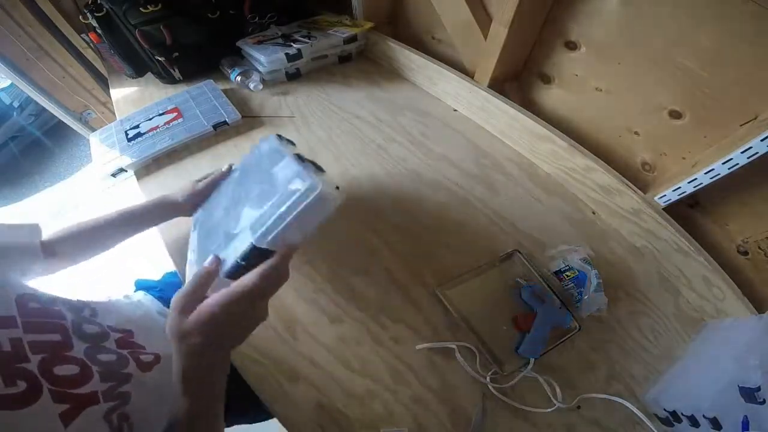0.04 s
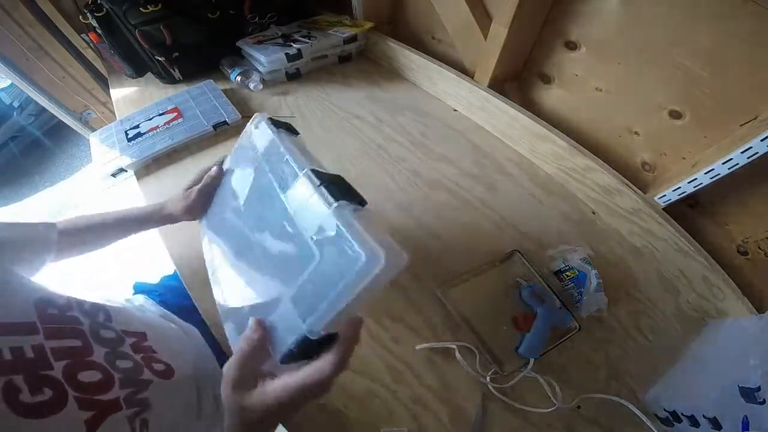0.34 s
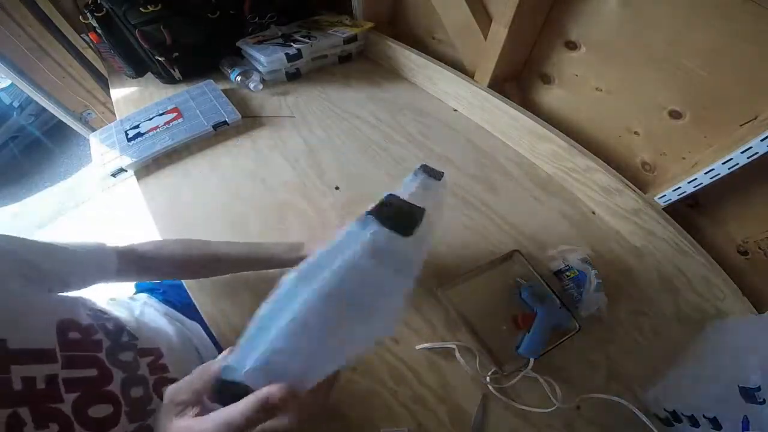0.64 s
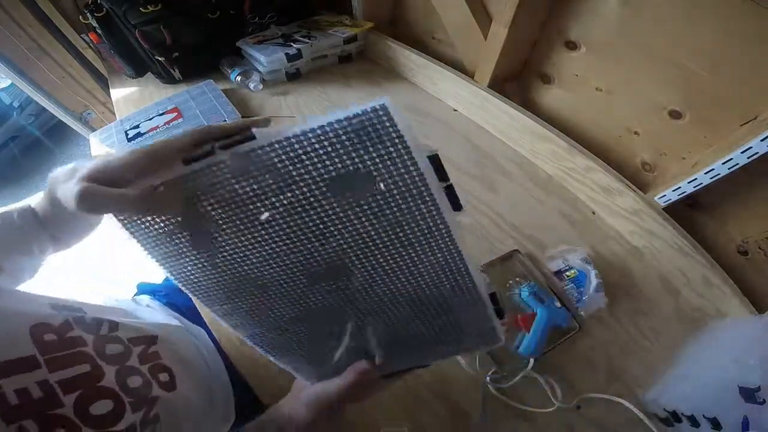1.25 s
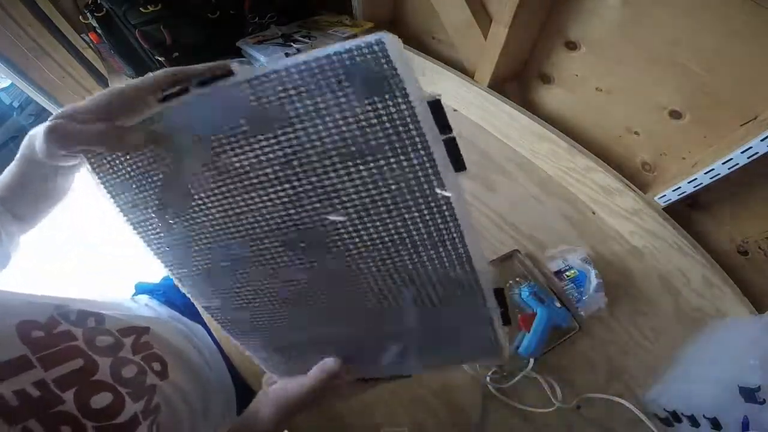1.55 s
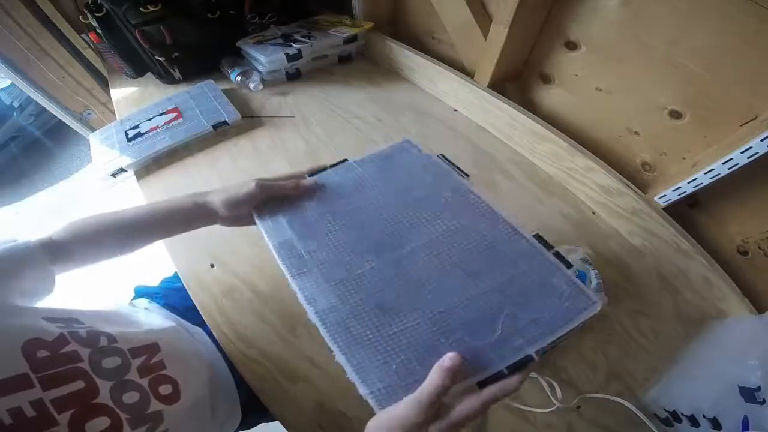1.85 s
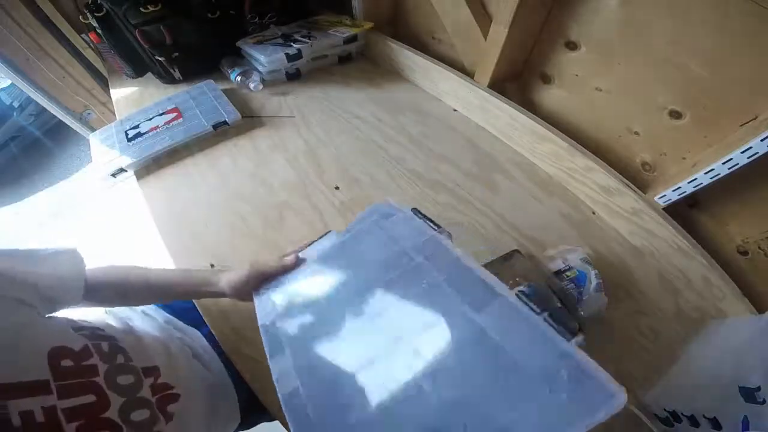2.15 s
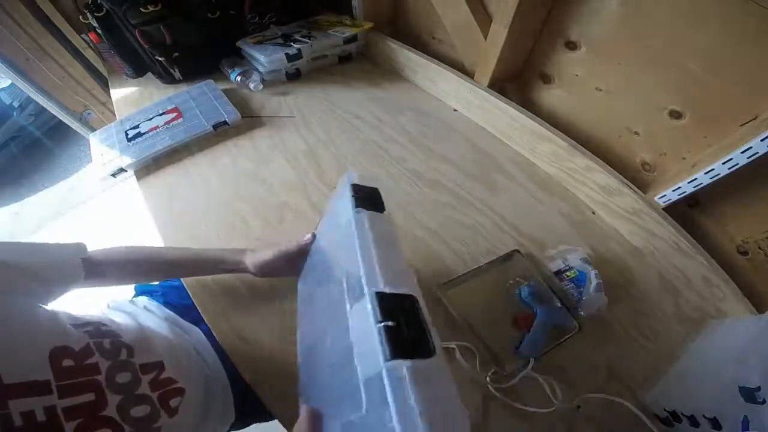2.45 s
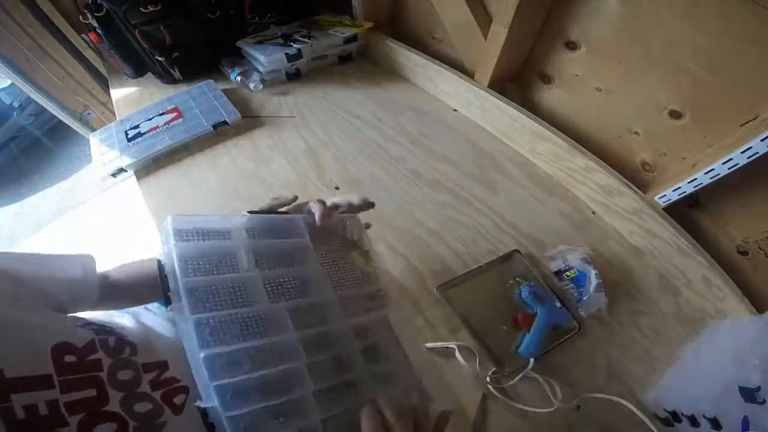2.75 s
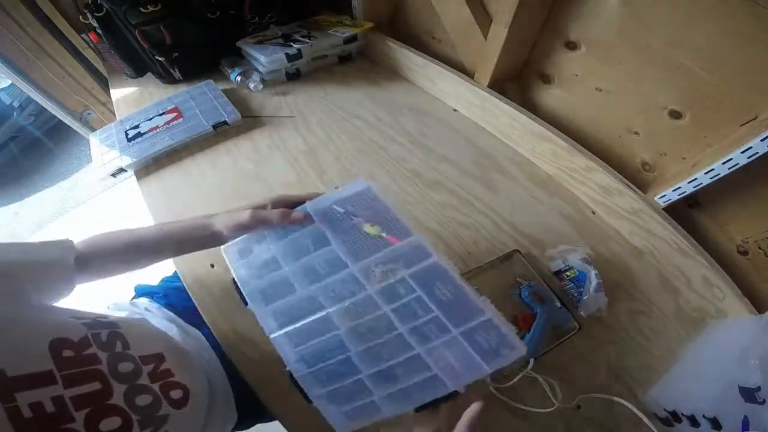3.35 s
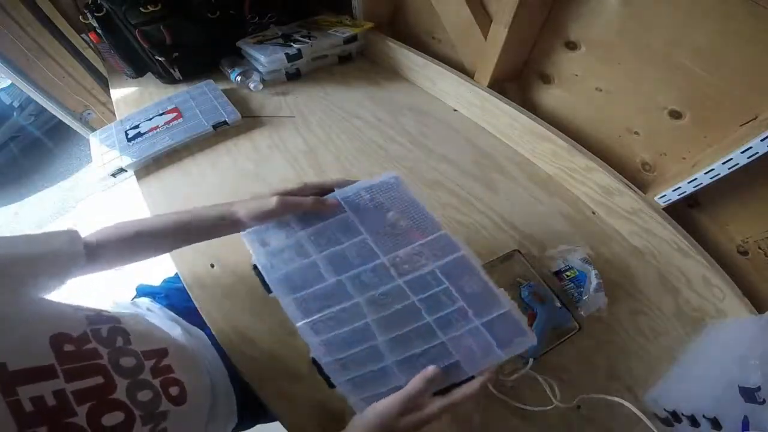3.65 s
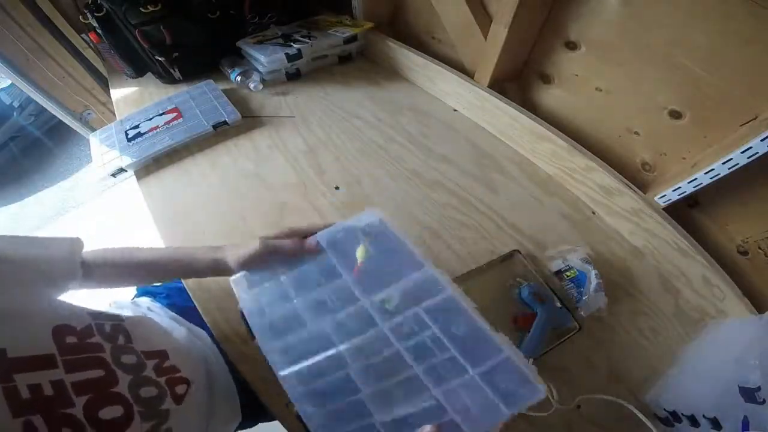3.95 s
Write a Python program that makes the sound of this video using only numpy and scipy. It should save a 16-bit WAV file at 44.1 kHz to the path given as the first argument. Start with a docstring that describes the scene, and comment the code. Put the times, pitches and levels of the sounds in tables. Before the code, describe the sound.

Lures rattle inside a plastic tackle box, close by in a small room. Quick bursts of clatter, hollow knocks and jingling hooks fill the first second, then come slightly further apart until about 2.6 seconds. Softer sliding follows, with a cluster of rattles around 3.2 seconds, a brief lull and a sharp clatter near 3.8. Hands thud on the box now and then, most clearly around 0.4, 1.6 and 3.9 seconds.

```python
"""Lures rattle in quick cascades as a plastic tackle box is shaken and turned over by hand.
At each tilt they slide and land: heavy bodies knock on the walls, hard shells clatter, hooks jingle.
Each impact is an impulse that excites damped resonances. Single pieces tap the dividers or make a
wall ring, and the hands thud on the box as they change grip. The workbench and the walls of a small
wooden room add a short reverberation, over a faint low background."""
import sys
import numpy as np
from scipy import signal
from scipy.io import wavfile

SR = 44100
rng = np.random.default_rng(int(sys.argv[2]) if len(sys.argv) > 2 else 0)


def bounce(signal):
    """Save signal as a 16-bit WAV file at the path given by the first command-line argument."""
    frames = np.transpose(np.atleast_2d(signal))
    limited = np.clip(frames, -1, 1)
    pcm = np.round(limited * 32767).astype(np.int16)
    wavfile.write(sys.argv[1], SR, pcm)


N = 176400

# Cascades of landing lures; levels in all tables are relative
# (peak time [s], build-up [s], decay [s], wall level [dB], shell level [dB], hook level [dB])
CASCADES = [ (0.093, 0.011, 0.02, -23, -22, -29), (0.13, 0.022, 0.02, -16.5, -27, -29.5),
            (0.239, 0.011, 0.018, -11.5, -14.5, -21.5), (0.334, 0.0095, 0.012, -17, -15.5, -26),
            (0.432, 0.0094, 0.019, -15.5, -28, -27.5), (0.5, 0.015, 0.017, -13, -17, -22),
            (.59, 0.0071, 0.026, -27.5, -22.5, -32.5), (0.66, 0.011, 0.027, -15.5, -18, -27),
            (0.716, 0.011, 0.015, -26, -29, -30.5), (0.75, 0.017, 0.0086, -25, -18, -24),
            (0.814, 0.011, 0.021, -15, -16, -24.5), (0.904, 0.0084, 0.012, -23.5, -15.5, -26),
            (0.959, 0.012, 0.025, -16.5, -15.5, -26), (1.098, 0.0091, 0.011, -36, -26, -34),
            (1.164, 0.04, 0.022, -18, -20, -30.5), (1.246, 0.035, 0.014, -17.5, -28, -31.5),
            (1.404, 0.017, 0.016, -14.5, -36, -23), (1.555, 0.024, 0.01, -12.5, -19, -21.5),
            (1.623, 0.0062, 0.023, -28, -28, -36), (1.748, .013, 0.025, -13, -30, -24.5),
            (1.937, 0.031, 0.031, -16.5, -31, -27.5), (2.075, 0.041, 0.056, -26.5, -31, -39.5),
            (2.122, 0.0061, 0.0073, -22, -28, -40), (2.311, 0.037, 0.041, -21, -30, -39),
            (2.347, 0.014, 0.029, -25, -19, -27.5), (2.466, 0.017, 0.04, -25, -26.5, -36.5),
            (2.548, 0.019, 0.037, -16, -17.5, -25), (2.75, 0.038, 0.089, -31.5, -30.5, -39.5),
            (3.022, 0.023, 0.11, -29.5, -26, -38.5), (3.132, 0.0059, 0.048, -23, -20.5, -36),
            (3.178, 0.021, 0.03, -24.5, -19, -35), (3.254, 0.0063, 0.033, -25, -21, -30.5),
            (3.439, 0.018, 0.019, -42, -35.5, -48), (3.614, 0.0083, 0.01, -25.5, -31, -35),
            (3.69, 0.022, 0.072, -33.5, -34.5, -45), (3.797, .014, 0.016, -14, -16.5, -24),
            (3.882, 0.015, 0.035, -37, -25, -36), (3.965, 0.012, 0.038, -24.5, -21.5, -32)]
# Loose pieces sliding between cascades (time [s], level [dB])
SLIDING = [(0, -38), (.19, -34.5), (.3, -27.5), (.56, -35.5), (.7, -33), (1.05, -40.5), (1.3, -28),
           (1.86, -32), (2.1, -40), (2.2, -50.5), (2.26, -31.5), (2.42, -51), (2.6, -38.5), (2.68, -45),
           (2.82, -68), (2.93, -45), (3.1, -30.5), (3.37, -50.5), (3.57, -51.5), (3.7, -37.5), (4, -35.5)]
# Single pieces striking a divider (time [s], level [dB], spectral tilt [dB/decade])
DIVIDER_TAPS = [(.212, -14, -3), (.224, -12, 12.5), (.3147, -14.5, 3), (0.4183, -13, 9), (0.492, -2.5, 13),
                (0.799, -11.5, -4), (0.8918, -10.5, 1), (.942, -7, 3), (1.0941, -7, 18), (1.1408, -12, -1),
                (1.551, -3.5, -1), (1.75, -12, -8), (1.934, -14, 4), (2.2224, -21, -9), (2.819, -16.5, 15),
                (3.204, -10.5, 1), (3.2468, -8.5, 5), (3.5975, -23, 21), (3.7557, -8.5, -7), (3.783, -5, 4),
                (3.960, -15, 12)]
# Heavy lures hitting a wall squarely (time [s], level [dB], wall frequency [Hz])
WALL_KNOCKS = [(.089, -16, 870), (.231, -15, 787), (.251, -7.5, 858), (.4718, -10.5, 773), (.609, -15, 696),
               (.6422, -8, 820), (.713, -12.5, 810), (.809, -12.5, 779), (.956, -8.5, 787),
               (1.181, -11.5, 760), (1.5233, -15, 806), (1.7217, -11.5, 605), (1.7346, -5, 828),
               (1.9298, -10, 874), (2.0175, -16.5, 780), (2.528, -14.5, 534), (2.546, -6.5, 758),
               (2.566, -15, 920), (3.126, -14.5, 820)]
# Hands bumping the box (time [s], level [dB], frequency [Hz])
HAND_BUMPS = [(0.142, -26, 164), (0.401, -17.5, 260), (0.422, -7.5, 365), (1.483, -20, 294),
              (1.634, -12, 265), (1.655, -9.5, 303), (2.46, -17.5, 230), (2.741, -17.5, 307),
              (3.012, -18.5, 290), (3.257, -21.5, 253), (3.314, -27.5, 298), (3.43, -26, 297),
              (3.699, -21.5, 300), (3.836, -17, 238), (3.859, -11, 370), (3.88, -14.5, 255)]
# Spectrum of each kind of contact (frequency [Hz], level [dB])
WALL_SPECTRUM = [(40, -55), (130, -19), (260, -6), (430, 0), (650, -0.5), (830, -2), (1080, -4.5),
                 (1600, -8.5), (3000, -16), (15000, -73)]
SHELL_SPECTRUM = [(40, -47), (300, -9.5), (800, -4.5), (1300, -1), (2100, 0.5), (3400, -3.5), (4600, -8.5),
                  (5600, -17), (9000, -17), (15000, -38.5)]
HOOK_SPECTRUM = [(40, -51), (1000, -31.5), (3000, 2), (4700, 1), (5500, -2.5), (7000, -1.5), (7700, -6.5),
                 (9600, -5), (11500, -11.5), (13500, -16.5), (15300, -29)]
TAP_SPECTRUM = [(40, -33), (140, -18), (300, -9), (850, 4), (1100, 0.5), (1600, -3), (3200, -12),
                (15000, -64.5)]
# Resonances of the box and its contents (frequency [Hz], bandwidth [Hz], level [dB])
BOX_MODES = [(296, 61, -22.5), (822, 115, -8), (885, 60, -11), (1760, 340, -12), (2048, 78, -8.5),
             (3280, 130, -13)]
# Bass of the rattle, which thins while the box stands on edge (time [s], gain [dB])
BASS_GAIN = [(.5, -0.5), (.57, -3.5), (.97, -2), (1.2, 1)]
# Decay of the room (frequency [Hz], reverberation time [s])
REVERB_TIMES = [(150, 0.25), (3000, 0.13), (14000, 0.23)]
# Spectrum of the steady background (frequency [Hz], level [dB])
BACKGROUND_SPECTRUM = [(20, -15), (38, -10), (57, -2.5), (70, -7), (95, 0.5), (140, -13.5), (540, -13),
                       (1000, -25), (4000, -38), (15000, -62)]


def lures():
    """Superposition of impacts: heavy bodies knock first, shells clatter, light hooks settle last."""
    heavy = agitation(slide_db=0.5, lag_s=0, linger=1.0, kind=0)
    hard = agitation(slide_db=0.5, lag_s=0.0012, linger=1.08, kind=1)
    light = agitation(slide_db=-9.5, lag_s=0.0029, linger=1.17, kind=2)
    walls = impacts(heavy, WALL_SPECTRUM, per_s=320, spread_db=6, fade_s=.002, ring_db=-2, hollow=.1)
    shells = impacts(hard, SHELL_SPECTRUM, per_s=420, spread_db=8, fade_s=.003, ring_db=5)
    hooks = impacts(light, HOOK_SPECTRUM, per_s=650, spread_db=10, fade_s=.005, ring_db=5)
    return amp(-5) * walls + amp(-3.5) * shells + amp(0.44) * hooks


def agitation(slide_db, lag_s, linger, kind, build_curve=1.65):
    """Incoherent sources add in power: sliding and cascades form one amplitude envelope."""
    t = np.arange(0, N / SR, .001)
    power = amp(np.interp(t, *np.transpose(SLIDING)) + slide_db) ** 2
    for peak, rise, fall, *levels in CASCADES:
        age = t - peak - lag_s
        falloff = np.where(age < 0, abs(age / rise) ** build_curve, 2 * age / (fall * linger))
        power += amp(levels[kind]) ** 2 * np.exp(-falloff)
    return np.interp(np.arange(N) / SR, t, np.sqrt(power))


def impacts(envelope, spectrum, per_s, spread_db, fade_s, ring_db, hollow=0, count=90):
    """Shot noise: many pieces strike at irregular times, with strengths that follow an envelope."""
    pieces = [contact(fade_s, ring_db) + hollow * wall_mode() for _ in range(count)]
    response = colour(signal.unit_impulse(2048), spectrum)
    coloured = signal.fftconvolve(pieces, response[None], axes=1)
    mean_energy = np.mean(np.sum(coloured ** 2, axis=1))
    jitter, force, choice = rng.random((12000, 3)).T
    times = (np.arange(len(jitter)) + 2 * jitter) / per_s
    strengths = unit(amp(spread_db * (2 * force - 1))) * np.sqrt(SR / per_s)
    hits = np.zeros(N)
    for s, gain, which in zip(times[times < N / SR], strengths, choice):
        add(hits, s, gain * envelope[int(s * SR)] * pieces[int(which * count)])
    return signal.oaconvolve(hits, response / np.sqrt(mean_energy))[:N]


def contact(fade_s, ring_db, size=1300):
    """Impulse response of a piece in its compartment: a click, then dense modes dying away."""
    t = np.arange(size) / SR
    sound = rng.standard_normal(size) * np.exp(-t / fade_s)
    sound *= amp(ring_db) / np.linalg.norm(sound)
    sound[0] += 1  # the click
    return sound / np.linalg.norm(sound)


def wall_mode(centre_hz=825.5, log_spread=0.17, ring_s=0.013):
    """Free vibration: each compartment wall rings at its own natural frequency."""
    t = np.arange(1300) / SR
    hz = centre_hz * np.exp(log_spread * rng.uniform(-1.06, 1))
    note = np.cos(2 * np.pi * hz * t) * np.exp(-t / ring_s)
    return note / np.linalg.norm(note)


def divider_taps(gain_db=-1):
    """A brief impact has a broad spectrum: single lures tap a divider, each with its own brightness."""
    out = np.zeros(N)
    for s, db, tilt_db in DIVIDER_TAPS:
        tap = colour(contact(fade_s=.0035, ring_db=-1.5), TAP_SPECTRUM, tilt_db, size=1024)
        add(out, s, amp(db + gain_db) * tap / abs(tap).max())
    return out


def wall_knocks(gain_db=-1.5, ring_s=0.009, click_db=-4.5, size=3000):
    """Impulse excitation: a square hit gives a dull click and leaves the wall in damped oscillation."""
    out, t = np.zeros(N), np.arange(size) / SR
    for s, db, hz in WALL_KNOCKS:
        click = colour(contact(fade_s=.0035, ring_db=1.5, size=size), WALL_SPECTRUM)
        note = np.sin(2 * np.pi * hz * t) * np.exp(-t / ring_s)
        add(out, s, amp(db + gain_db) * (note + amp(click_db) * click / abs(click).max()))
    return out


def hand_bumps(gain_db=1, rise_s=0.00059, fade_s=0.0057, scuff_gain=0.48, size=4000):
    """Damped flexure: a soft push bends the big panels, giving a low thud with a scuff of skin."""
    out, t = np.zeros(N), np.arange(size) / SR
    for s, db, hz in HAND_BUMPS:
        softness = np.exp(-db / 39)  # weaker touches are slower and scuff more
        push = (1 - np.exp(-t / (rise_s * softness ** 2))) * np.exp(-t / (fade_s * softness))
        band = signal.butter(2, [hz * 0.51, hz * 1.47], "band", fs=SR)
        scuff = unit(signal.lfilter(*band, rng.standard_normal(size)))
        thud = push * (np.sin(2 * np.pi * hz * t) + scuff_gain * softness * scuff)
        add(out, s, amp(db + gain_db) * thud * np.linalg.norm(push) / np.linalg.norm(thud))
    return out


def box_resonance(x, gain_db=8.5, flex_depth=.025, flex_per_s=14):
    """Resonance: contacts drive the box's modes, whose frequencies wander as the hands flex it."""
    out, t = x, np.arange(N) / SR
    for hz, width_hz, db in BOX_MODES:
        drift = np.interp(t * flex_per_s, np.arange(N), rng.standard_normal(N))
        carrier = np.exp(2j * np.pi * np.cumsum(hz * (1 + flex_depth * drift)) / SR)
        pole = np.exp(-np.pi * width_hz / SR)
        # shifting down, smoothing and shifting back makes a moving band-pass
        baseband = signal.lfilter([1 - pole], [1, -pole], x / carrier + 1e-18)
        out = out + amp(gain_db + db) * 2 * (carrier * baseband).real
    return out


def bass_shift(x, cutoff_hz=526):
    """Interference: a low-passed copy, added or subtracted, varies the bass as the box turns."""
    low = signal.sosfiltfilt(signal.butter(4, cutoff_hz, fs=SR, output="sos"), x)
    gain = amp(np.interp(np.arange(N) / SR, *np.transpose(BASS_GAIN)))
    return x + low * (gain - 1)


def room(x, gap_s=.004):
    """Reverberation: diffuse reflections from the bench and wooden walls decay exponentially."""
    hz, t, noise = signal.stft(rng.standard_normal(16384), SR, nperseg=256)
    decay = amp(-60 * t / at_frequency(REVERB_TIMES, hz)[:, None])
    tail = signal.istft(noise * decay, SR)[1]
    tail[:round(gap_s * SR)] = 0
    return signal.oaconvolve(x, tail / np.linalg.norm(tail))[:N]


def background(level_db=-44):
    """Stationary noise, its power mostly at low frequencies, gives a faint rumble."""
    return amp(level_db) * unit(colour(rng.standard_normal(N), BACKGROUND_SPECTRUM, size=16384))


def colour(x, spectrum, tilt_db=0, size=4096):
    """Minimum-phase filtering imposes a spectrum, tilted in dB per decade above 300 Hz."""
    hz = abs(np.fft.fftfreq(size, 1 / SR))
    decades = np.log10(np.maximum(hz, 300) / 1000)
    log_gain = np.log(amp(at_frequency(spectrum, hz) + tilt_db * decades))
    response = np.fft.ifft(np.exp(np.conj(signal.hilbert(log_gain)))).real[:size // 2]
    return signal.oaconvolve(x, response)[:len(x)]


def at_frequency(table, hz):
    """Interpolation on a logarithmic frequency axis."""
    frequencies, values = np.transpose(table)
    return np.interp(np.log(hz + 1), np.log(frequencies), values)


def amp(db):
    """Amplitude ratio of a level in decibels."""
    return 10 ** (np.asarray(db) / 20)


def unit(x):
    """Normalisation to unit mean power."""
    return x / np.sqrt(np.mean(x ** 2) + 1e-20)


def add(mix, s, sound):
    """Superposition of a sound that starts at s seconds."""
    part = mix[max(0, round(s * SR)):][:len(sound)]
    part += sound[:len(part)]


def scene(room_db=-10.5):
    """Sound pressures add: the direct sound of the box, its reverberation and the background."""
    rattle = box_resonance(lures() + divider_taps()) + wall_knocks()
    direct = bass_shift(rattle) + hand_bumps()
    rumble = background()
    return (direct + amp(room_db) * room(direct) + rumble)[None]


def record(dry, ceiling=.95, cutoff_hz=15250):
    """Soft saturation rounds the highest peaks, then a low-pass filter limits the bandwidth."""
    rounded = dry / (1 + (dry / ceiling) ** 6) ** (1 / 6)
    lowpass = signal.firwin(511, cutoff_hz, window=("kaiser", 9), fs=SR)
    return signal.oaconvolve(rounded, lowpass[None], "same")


dry = scene()
out = record(dry)
bounce(out)
```